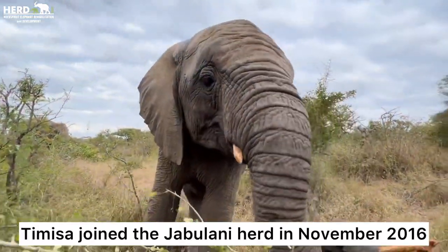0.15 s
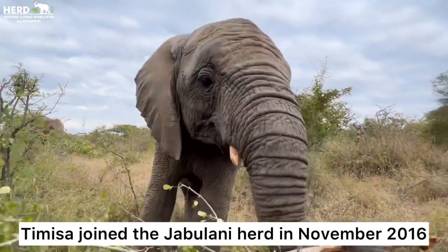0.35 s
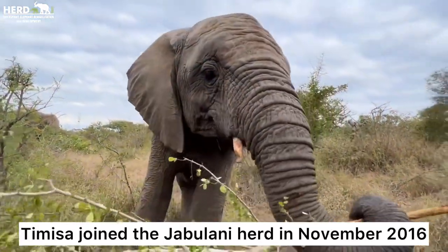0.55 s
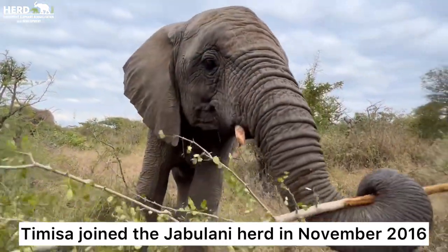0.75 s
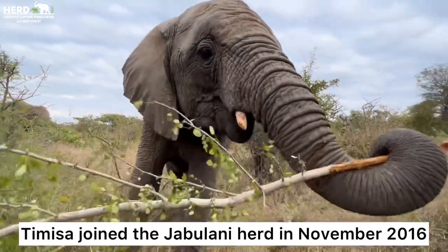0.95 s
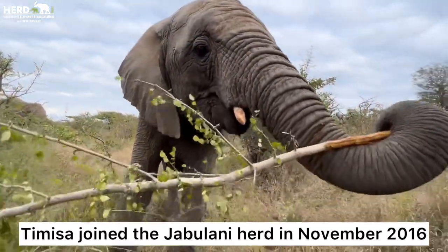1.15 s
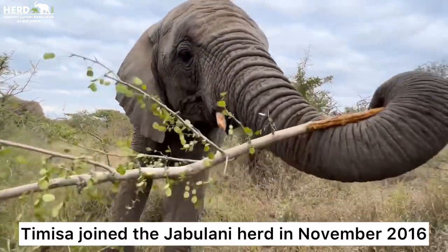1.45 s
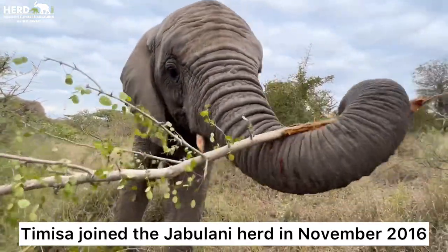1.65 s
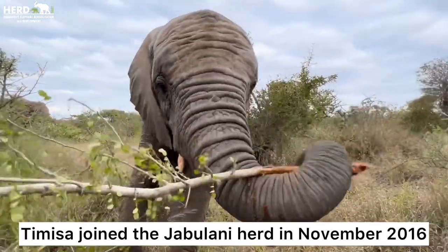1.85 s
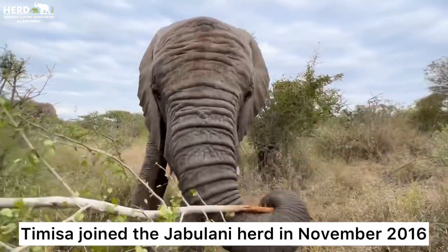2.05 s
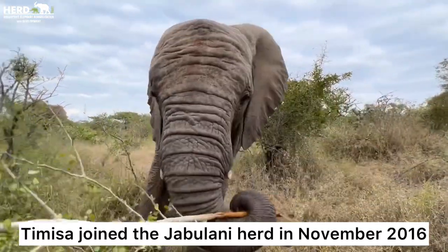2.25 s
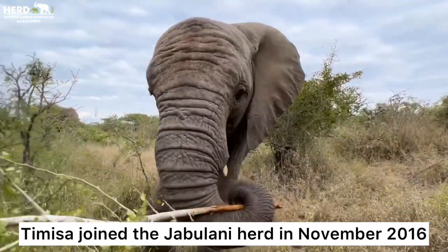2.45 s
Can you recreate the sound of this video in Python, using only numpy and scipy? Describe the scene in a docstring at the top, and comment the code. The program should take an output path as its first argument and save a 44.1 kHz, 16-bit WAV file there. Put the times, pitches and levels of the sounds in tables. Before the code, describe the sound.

Branch snapping and rustling, close: crisp leaf crackle runs throughout, a cluster of sharp twig cracks comes early, then mostly rustling, then a few more snaps with woody knocks. Outdoors, handheld stereo microphone, faint wind.

```python
"""Outdoors in dry grass, close to a handheld camera, an elephant drags a leafy branch.
Leaves and grass rustle as patchy noise with dense crackles; twigs snap as short ringing noise bursts.
Knocks and the woody body of the strongest snaps are resonant noise; the heavy end thuds and drones low.
A light wind rumbles as low noise behind it all.
The left microphone port hears the middle range earlier and louder; the upper treble is largely shared."""
import sys
import numpy as np
from scipy import signal
from scipy.fft import rfft, irfft, next_fast_len
from scipy.io import wavfile
from scipy.ndimage import uniform_filter1d, map_coordinates

SR = 44100
rng = np.random.default_rng(int(sys.argv[2]) if len(sys.argv) > 2 else 0)


def to_wav(s):
    """Save 16-bit WAV."""
    ch = np.atleast_2d(s).T  # columns
    pcm = np.round(np.clip(ch, -1, 1) * 32767)  # PCM
    wavfile.write(sys.argv[1], SR, pcm.astype(np.int16))


N = 114660

# Leaf crackles: density, middle pitch and its log spread, size spread, level against the leaf noise
CRACKLES_PER_S, CRACKLE_HZ, CRACKLE_SPREAD, CRACKLE_TAIL_DB, CRACKLE_DB = 1200, 7480, 0.342, 2.5, -7.5
STALK_HZ, STALK_DB = 1515, -5.5  # duller crackles of thicker stalks, against the scrape noise
SWISH_FROM_HZ, SWISH_CRACKLE_DB = 1830, -6  # sweeps are thinner and grainier than the steady rustle
# Snaps: rise, decay of the burst, decay and level of its weaker tail
RISE_S, SNAP_T60, TAIL_T60, TAIL_DB = 0.0016, 0.0055, 0.04, -24.5
OWN_WIDTH, OWN_DB = 0.088, 6.5  # a snap's own tone: width as a fraction of its pitch, gain
LOW_HZ, LOW_DB = 1330, -24  # the dull part of a snap
BREAK_DB = 10  # the single sharp crack over the noise
TREBLE_HZ = 10000  # twig resonances above this follow each snap's treble setting
KNOCK_T60, KNOCK_WIDTH, KNOCK_BODY_HZ = 0.086, 0.13, 660  # s, fraction of the pitch, Hz
THUD_RISE_S, THUD_T60 = 0.0057, 0.078
DRONE_KNOTS_PER_S, DRONE_BED_DB = 45, 1  # speed of the drone's wavering, noise against the drone
LAG_S, LAG_FROM_HZ, LAG_TO_HZ = 0.00047, 70, 7620  # lateness of the right port and its range
TOP_HZ = 16900


def amp(db):
    """Amplitude factor of a level in dB."""
    return 10 ** (np.asarray(db) / 20)


def unit(x):
    """x scaled to an rms of 1."""
    return x / np.sqrt(np.mean(x ** 2) + 1e-20)


def along(points, hz):
    """Values at hz from (Hz, value) points on a log axis."""
    f, v = np.transpose(points)
    return np.interp(np.log(hz + 1), np.log(f + 1), v)


def curves(rows):
    """One value per sample for each column after the time."""
    s, *cols = np.transpose(rows)
    return [np.interp(np.arange(N) / SR, s, c) for c in cols]


def wobble(rate):
    """A smooth random curve, rate knots a second."""
    knots = rng.standard_normal(int(N * rate / SR) + 4)
    return map_coordinates(knots, [np.arange(N) * rate / SR])


def filtered(x, response):
    """x filtered by a complex response of frequency."""
    n = x.shape[-1]
    m = next_fast_len(2 * n)
    return irfft(rfft(x, m) * response(np.fft.rfftfreq(m, 1 / SR)), m)[..., :n]


def peak(f, hz, width):
    """One causal resonance."""
    return 1j * f * width / (hz * hz - f * f + 1j * f * width)


def rush(spectrum, patchy_db):
    """Two unrelated noises, together of rms 1, under one field of random gain patches."""
    z = signal.stft(rng.standard_normal((2, N)), nperseg=256)[2]
    field = uniform_filter1d(rng.standard_normal(z.shape[1:]), size=5, axis=0)  # over frequency
    field = uniform_filter1d(field, size=8, axis=1)  # over time
    pair = signal.istft(z * amp(patchy_db * unit(field)), nperseg=256)[1][:, :N]
    return unit(filtered(pair, lambda hz: amp(along(spectrum, hz))))


def crackles(centre_hz):
    """Tiny leaf and stalk breaks of a few cycles, most faint, some strong; each channel has its own pitches."""
    g = rng.random((round(CRACKLES_PER_S * N / SR), 3))
    t = np.arange(320) / SR
    size = amp(-CRACKLE_TAIL_DB * np.log(1 - 0.99 * g[:, 1:2]))
    at = (g[:, :1] * N).astype(int) + np.arange(len(t))
    out = []
    for _ in range(2):
        spread = np.exp(CRACKLE_SPREAD * rng.standard_normal((len(g), 1)))
        hz = np.clip(centre_hz * spread, 500, 14500)
        grain = size * np.sin(2 * np.pi * hz * t) * np.exp(-t * hz / 4.2)
        out.append(np.bincount(at.ravel(), grain.ravel(), N + len(t))[:N])
    return unit(np.array(out))


def rustle():
    """Leaves and grass brushed by the branch: fluttering noise and crackles that swell with each sweep."""
    # Steady brushing: (time [s], leaf level [dB], lower scrape level [dB])
    brushing = [(0,-50,-61), (.16,-53.5,-65), (.26,-48,-60), (.43,-50,-64.5), (.54,-45.5,-58.5),
                (.65,-47,-63), (.8,-48.5,-54.5), (.98,-48,-64), (1.09,-48,-64), (1.3,-52.5,-60.5),
                (1.45,-47.5,-57.5), (1.61,-48.5,-55.5), (1.82,-47.5,-55.5), (1.99,-46,-52.5),
                (2.05,-48,-60.5), (2.3,-48,-58), (2.6,-51.5,-59.5)]
    # Noise colour of leaves, falling away steeply near 16 kHz: (frequency [Hz], relative level per Hz [dB])
    leaf_colour = [(880,-18), (1500,-9.5), (1980,-2.5), (3470,-5), (4180,-9.5), (4520,-2), (5900,-3.5),
                   (8660,-0.5), (10800,-5.5), (11900,-7), (15300,-6.5), (15800,-42), (16000,-70)]
    # Noise colour of the lower scrape: (frequency [Hz], relative level per Hz [dB])
    scrape_colour = [(120, -38), (200, -5), (352, -5.5), (574, 2), (1170, 3.5), (3000, -5.5), (3900, -3),
                     (6600, -120)]
    # Leaf sweeps: (time [s], level [dB], half length [s])
    swishes = [(0.239, -44, 0.056), (0.423, -44, 0.026), (0.577, -45, 0.085), (0.819, -44.5, 0.026),
               (1.934, -42.5, 0.059), (2.095, -42, 0.013), (2.286, -43.5, 0.061), (2.529, -50, 0.016)]
    leaf_db, low_db = curves(brushing)
    t = np.arange(N) / SR
    flutter = 1.16 * wobble(11.95) + 1.03 * wobble(45.3)  # dB
    grains = filtered(crackles(CRACKLE_HZ), lambda hz: hz < leaf_colour[-1][0])
    steady = rush(leaf_colour, patchy_db=2.0) + amp(CRACKLE_DB) * grains
    leaves = amp(leaf_db + flutter) * steady

    sweep = sum(amp(db) * np.exp(-((t - s) / half) ** 2) for s, db, half in swishes)
    # The same crackles backwards, so they do not coincide with the steady ones
    brushed = rush(leaf_colour, patchy_db=3.0) + amp(SWISH_CRACKLE_DB) * grains[:, ::-1]
    thinned = filtered(brushed, lambda hz: hz ** 2 / (hz ** 2 + SWISH_FROM_HZ ** 2))
    leaves = leaves + sweep * amp(flutter) * thinned

    scrape = rush(scrape_colour, patchy_db=2.5) + amp(STALK_DB) * crackles(STALK_HZ)
    return leaves + amp(low_db + flutter + 1.67 * wobble(25.08)) * scrape


def snaps():
    """Each break is a sharp crack in a short noise burst with a weaker tail, ringing the twig and its own tone."""
    # Breaks: (time [s], level [dB], own tone [Hz], treble [dB], first channel over second before the ports [dB])
    breaks = [(0.2802,-18,4800,4.5,1), (0.287,-27,11800,-11,13), (0.3208,-24,12100,-9,13),
              (0.3249,-26.5,4760,-2.5,6), (0.3304,-31,7950,0,6), (0.3332,-32,7300,4,11),
              (0.5452,-22,4760,0,4), (0.576,-24,4860,3,6), (0.5887,-11,7667,-1,2),
              (0.5904,-13.5,4930,-1,14), (.597,-28,7960,5,-5), (.632,-38,12600,9,2),
              (0.6388,-18,9700,2.5,-3.5), (.6455,-29,11600,-4,-7.5), (0.6827,-28.5,11400,4,5),
              (0.7333,-33,7750,-10,2), (1.4654,-31,8100,-10,5), (1.559,-35,8700,-4,3), (1.588,-30,8800,1,6),
              (1.6486,-35,6700,-8,4), (1.6645,-35,6900,-8,6), (1.691,-36.5,4530,-6,-1),
              (1.906,-27.5,7950,-9,3), (1.9094,-19.5,8550,-12,5), (1.9145,-21,7620,0,0.5),
              (1.9237,-34,9000,-10,3), (1.9942,-31.5,9100,-3,0), (2.028,-39,11020,5,2),
              (2.289,-32,7400,-11,4), (2.307,-22,6280,-1.5,1), (2.3265,-37,8600,-4,3)]
    # Resonances of a twig: (frequency [Hz], width [Hz], level [dB])
    twig = [(1840, 790, -10.5), (3040, 304, -0.5), (4790, 660, -1), (7300, 880, 3), (11750, 1140, 0.5),
            (15000, 650, -2)]
    out, t = np.zeros((2, N + SR)), np.arange(SR // 10) / SR
    decay = amp(-60 * t / SNAP_T60) + amp(TAIL_DB - 60 * t / TAIL_T60)
    shape = (1 - np.exp(-(t / RISE_S) ** 2)) * decay
    for s, db, hz, treble_db, side_db in breaks:
        def colour(f):
            own = amp(OWN_DB) * peak(f, hz, OWN_WIDTH * hz)
            dull = amp(LOW_DB) * peak(f, LOW_HZ, 1400)
            ringing = sum((-1) ** k * amp(level + treble_db * (c > TREBLE_HZ)) * peak(f, c, w)
                          for k, (c, w, level) in enumerate(twig))  # neighbours in opposite sign
            return (own + dull + ringing) * peak(f, 3400, 14300)

        push = shape * rng.standard_normal((2, len(t)))
        push[:, round(RISE_S * SR)] += amp(BREAK_DB) * shape.max()
        burst = filtered(push, colour)
        burst = burst / np.abs(burst).max(1).mean()
        start = round((s - RISE_S / 2) * SR)
        out[:, start:][:, :len(t)] += amp(db) * burst * amp([[0], [-side_db]])
    return out[:, :N]


def knocks():
    """Knocks and the woody body of the strongest snaps: decaying noise through a narrow and a broad resonance."""
    # Knocks and snap bodies: (time [s], level [dB], strongest frequency [Hz])
    bodies = [(0.019, -46, 920), (.083, -48.5, 1410), (.173, -49, 402), (.588, -30.5, 2900),
              (.59, -39.5, 1110), (1.2, -51.5, 600), (1.422, -45.5, 590), (1.466, -46, 1900),
              (1.499, -51, 522), (1.823, -35, 1189), (1.909, -32, 1960), (1.917, -40, 660),
              (2.306, -37.5, 1692), (2.329, -43, 1766)]
    out, t = np.zeros((2, N + SR)), np.arange(SR // 8) / SR
    shape = (1 - np.exp(-t / 0.003)) * amp(-60 * t / KNOCK_T60)
    for s, db, hz in bodies:
        push = shape * rng.standard_normal((2, len(t)))
        burst = filtered(push, lambda f: peak(f, hz, KNOCK_WIDTH * hz) + 0.27 * peak(f, KNOCK_BODY_HZ, 750))
        out[:, round(s * SR):][:, :len(t)] += amp(db) * burst / np.abs(burst).max(1).mean()
    return out[:, :N]


def thuds():
    """The thick end hits the ground: a decaying low tone with a weaker partial at 1.4 times its pitch."""
    # Hits on the ground: (time [s], level [dB], pitch [Hz])
    hits = [(0.087, -46, 174), (0.642, -41.5, 171), (0.688, -47, 161), (0.717, -45.5, 195),
            (0.765, -46.5, 179), (0.815, -46.5, 164), (0.881, -42.5, 148), (1.83, -50, 148.8),
            (1.919, -39.5, 179.5), (2.245, -47, 174.8)]
    out, t = np.zeros(N + SR), np.arange(SR // 3) / SR
    for s, db, hz in hits:
        phase = 2 * np.pi * rng.random()
        ring = np.sin(2 * np.pi * hz * t) + 0.36 * np.sin(2 * np.pi * 1.4 * hz * t + phase)
        envelope = amp(db - 60 * t / THUD_T60) * (1 - np.exp(-t / THUD_RISE_S))
        out[round(s * SR):][:len(t)] += envelope * ring
    return out[:N]


def drag():
    """The thick end drones low while dragged: a wavering tone of drifting pitch on a bed of low noise."""
    # Woody drone: (time [s], level [dB], pitch [Hz])
    pull = [(0, -74, 168.6), (.3, -88, 160.2), (.6, -104, 170.7), (.66, -69, 175), (.86, -69.5, 154.9),
            (.97, -72, 109.9), (1.2, -80, 99.9), (1.38, -72, 95.1), (1.54, -63.5, 98.7), (1.58, -69.5, 165),
            (1.8, -65, 164.5), (2, -70.5, 150), (2.15, -95, 150), (2.27, -63.5, 170), (2.4, -83, 148.9),
            (2.6, -70.5, 165.3)]
    # Noise colour of the bed: (frequency [Hz], relative level per Hz [dB])
    bed_colour = [(60, -32), (100, 0), (170, 0.5), (250, -2.5), (400, -9.5), (600, -35)]
    level_db, hz = curves(pull)
    turn = 2 * np.pi * np.cumsum(hz) / SR
    in_phase = (0.45 + wobble(DRONE_KNOTS_PER_S)) * np.sin(turn)
    drone = unit(in_phase + wobble(DRONE_KNOTS_PER_S) * np.cos(turn))
    return amp(level_db) * (drone + amp(DRONE_BED_DB) * rush(bed_colour, patchy_db=3.0))


def wind():
    """Low air on the microphone: unrelated noise in two channels, rising and falling together."""
    # Wind strength: (time [s], level [dB])
    air = [(0,-91), (.19,-96), (.53,-91), (.57,-75), (.88,-76), (1.06,-89), (1.21,-61), (1.29,-75),
           (1.8,-75), (1.86,-55.5), (2.08,-80), (2.13,-67), (2.3,-69.5), (2.6,-79)]
    # Noise colour of the wind: (frequency [Hz], relative level per Hz [dB])
    wind_colour = [(18, -21), (35, 4), (60, 5), (90, 9), (140, -46)]
    return amp(curves(air)[0]) * rush(wind_colour, patchy_db=1.5)


def ports(pair):
    """The right port gets part of the left's sound, late in the middle range, and part of its own."""
    # Likeness of the ports: (frequency [Hz], left-right likeness [-1 to 1])
    likeness = [(25, -0.79), (60, 0.23), (170, 0.46), (450, 0.18), (800, 0.63), (1800, 0.45),
                (3500, 0.0092), (5500, 0.076), (7200, -0.55), (7800, 1), (15000, 0.78)]
    # Balance of the ports: (frequency [Hz], left over right [dB])
    balance = [(25, 0), (120, 1.5), (600, 3.5), (1300, 1.5), (2400, 3.5), (4200, 2), (5500, 6.5),
               (7300, 9.5), (8200, .5), (15000, -0.5)]

    def alike(hz):
        return np.clip(along(likeness, hz), -1, 1)

    def late(hz):
        return np.exp(-2j * np.pi * np.maximum(hz - LAG_FROM_HZ, 0) * LAG_S * (hz < LAG_TO_HZ))

    right = filtered(pair, lambda hz: [alike(hz) * late(hz), np.sqrt(1 - alike(hz) ** 2)]).sum(0)
    both = np.array([pair[0], right])
    return filtered(both, lambda hz: amp(np.outer([0.5, -0.5], along(balance, hz))))


def scene():
    """All sources through the two ports."""
    return ports(rustle() + snaps() + knocks() + thuds() + drag() + wind())


def record(dry):
    """The camera keeps nothing above its band limit."""
    return filtered(dry, lambda hz: hz < TOP_HZ)


dry = scene()
out = record(dry)
to_wav(out)
```